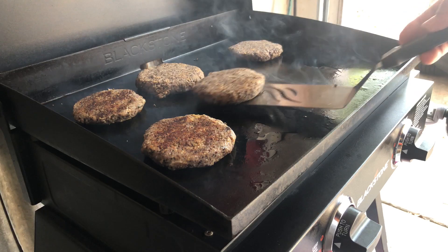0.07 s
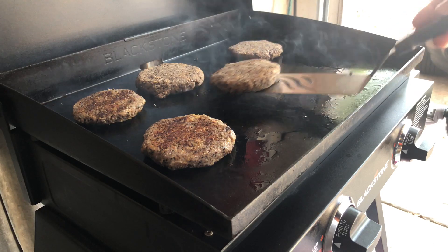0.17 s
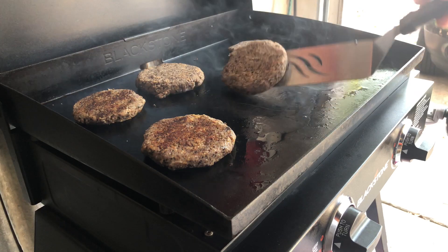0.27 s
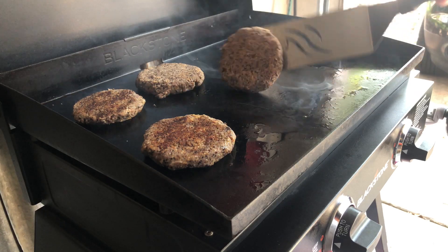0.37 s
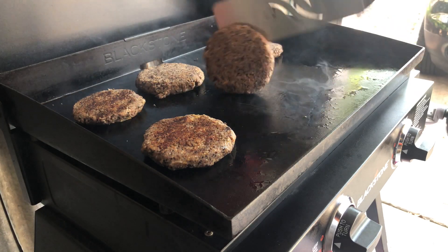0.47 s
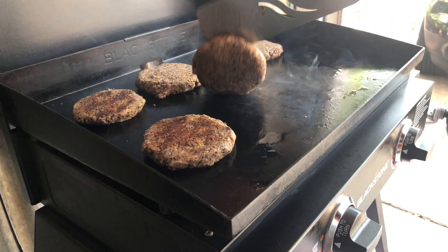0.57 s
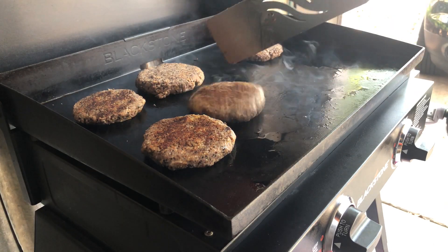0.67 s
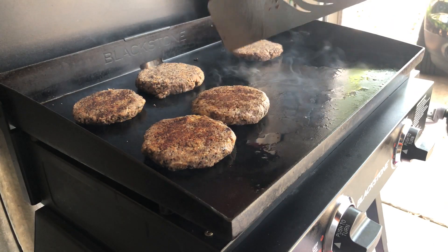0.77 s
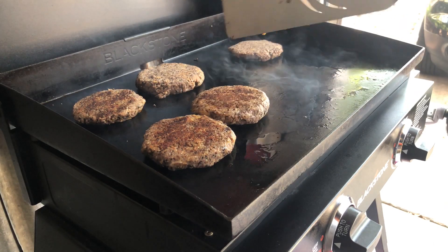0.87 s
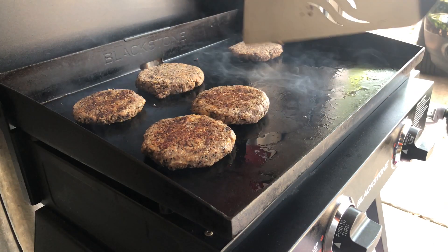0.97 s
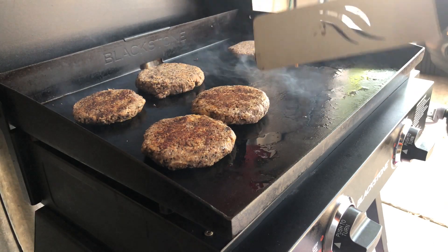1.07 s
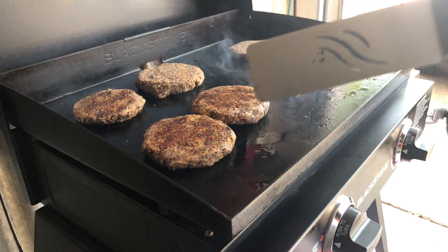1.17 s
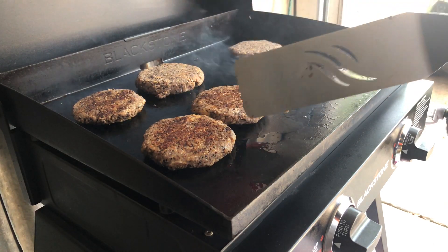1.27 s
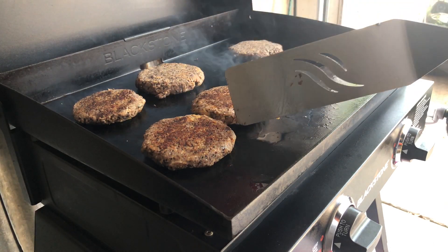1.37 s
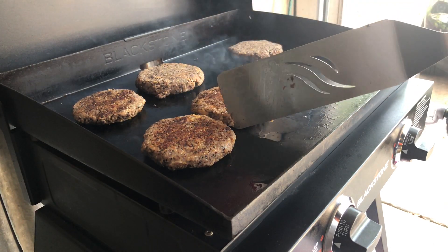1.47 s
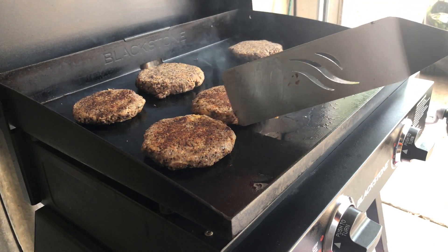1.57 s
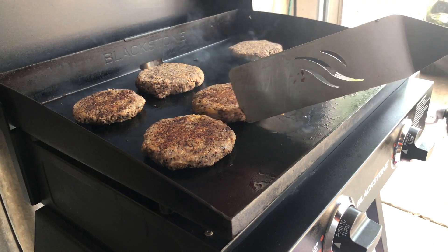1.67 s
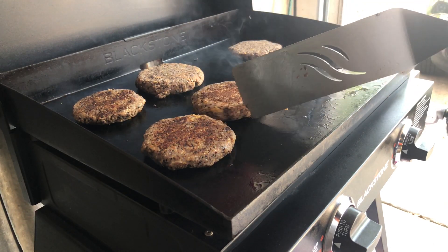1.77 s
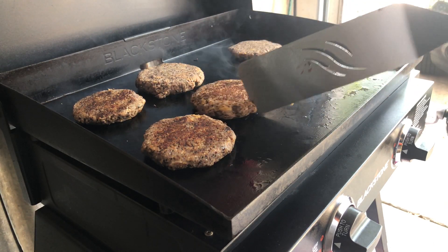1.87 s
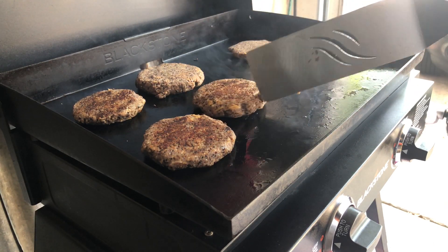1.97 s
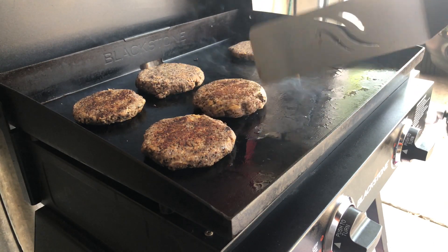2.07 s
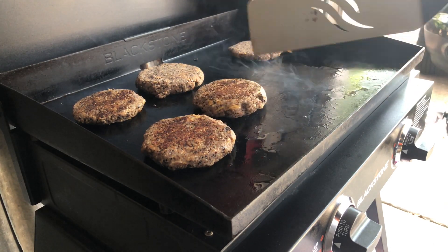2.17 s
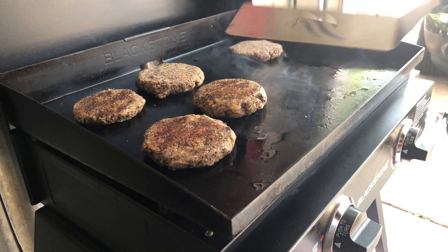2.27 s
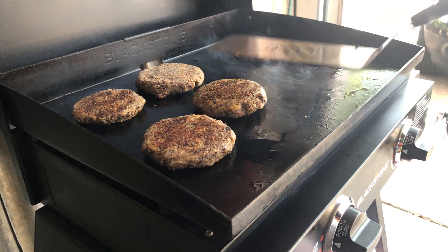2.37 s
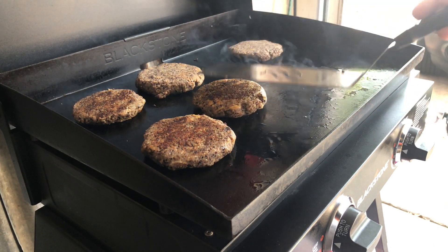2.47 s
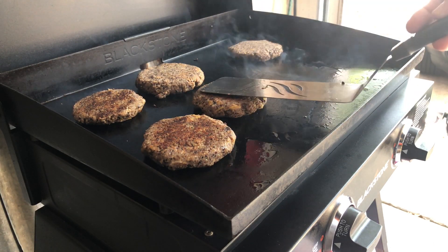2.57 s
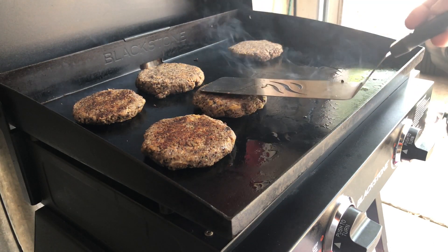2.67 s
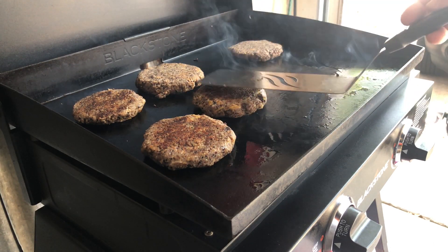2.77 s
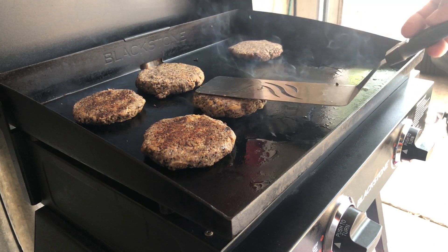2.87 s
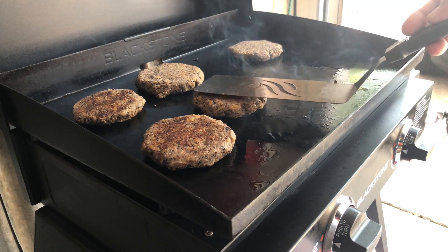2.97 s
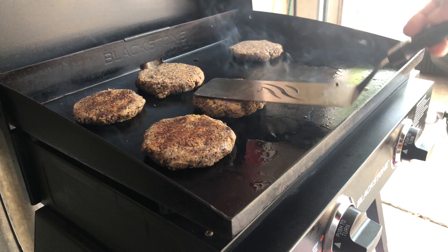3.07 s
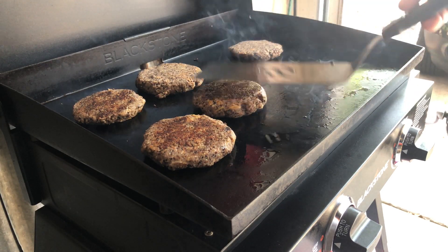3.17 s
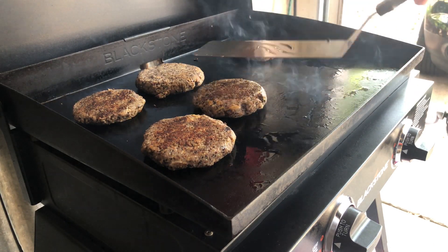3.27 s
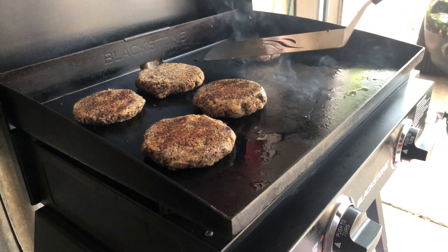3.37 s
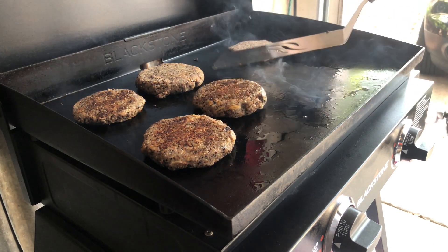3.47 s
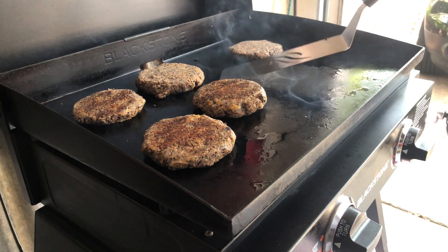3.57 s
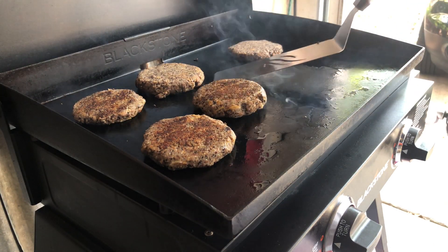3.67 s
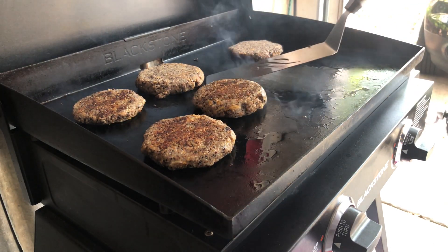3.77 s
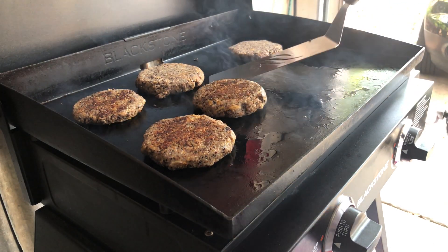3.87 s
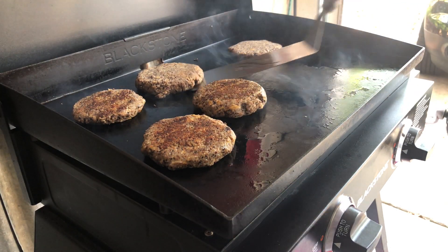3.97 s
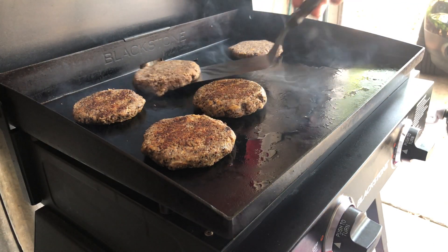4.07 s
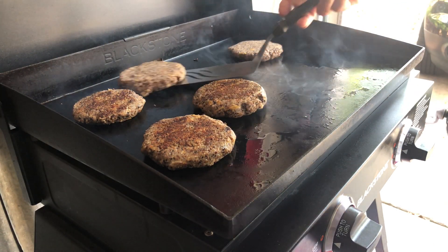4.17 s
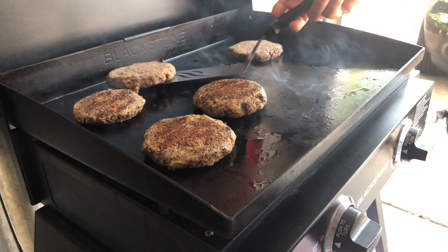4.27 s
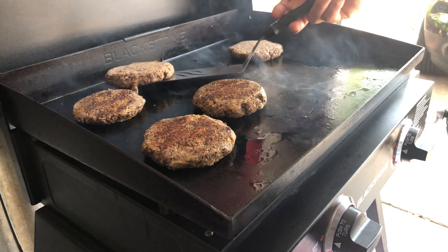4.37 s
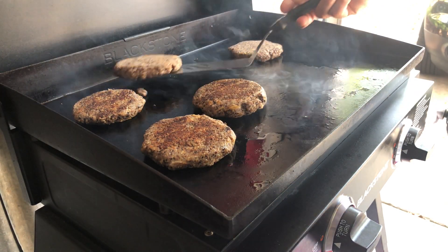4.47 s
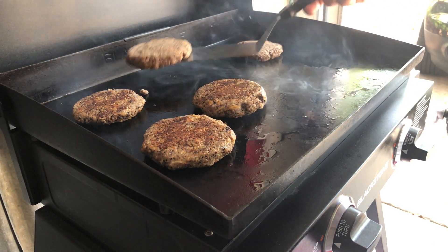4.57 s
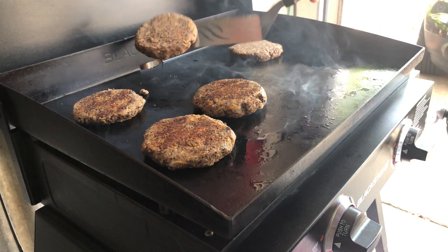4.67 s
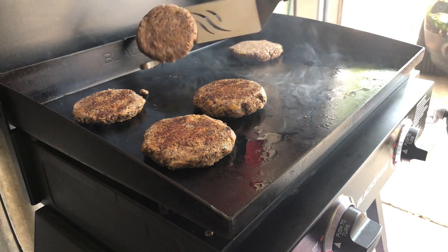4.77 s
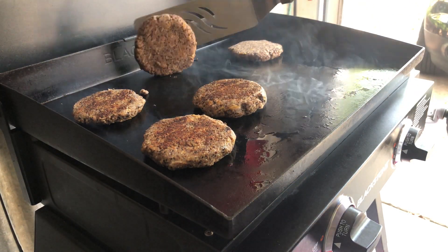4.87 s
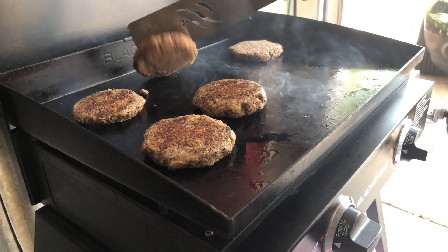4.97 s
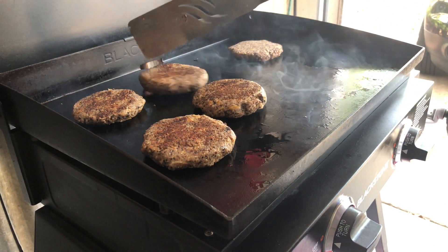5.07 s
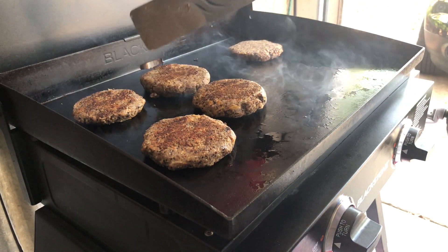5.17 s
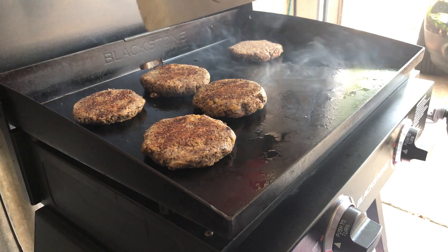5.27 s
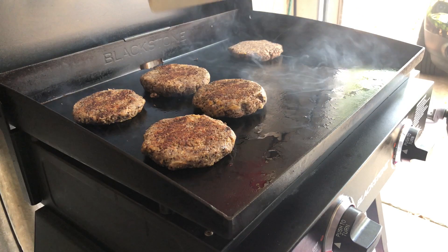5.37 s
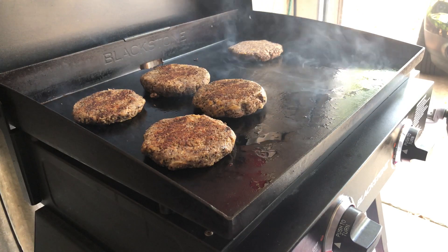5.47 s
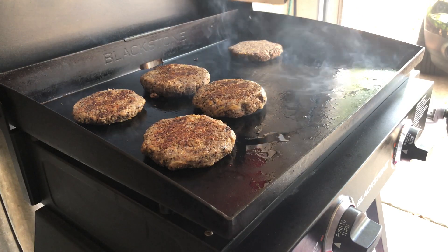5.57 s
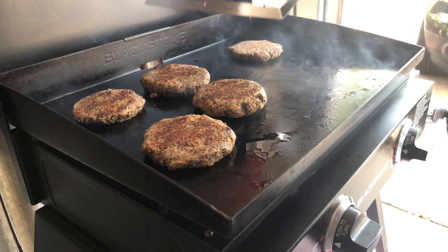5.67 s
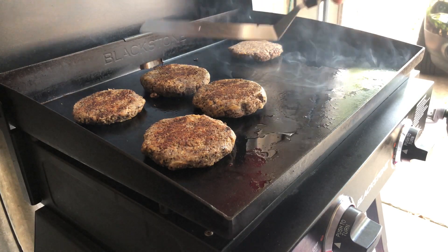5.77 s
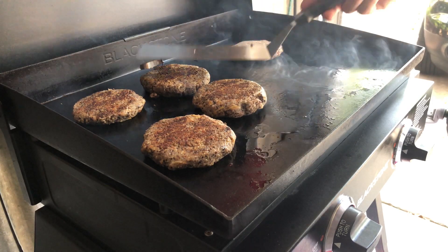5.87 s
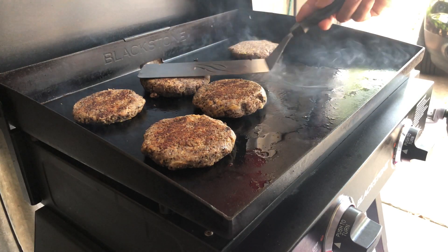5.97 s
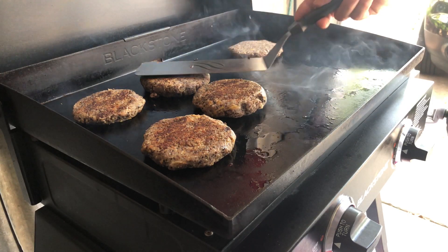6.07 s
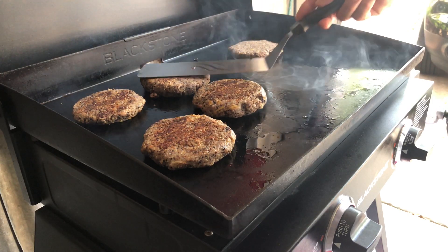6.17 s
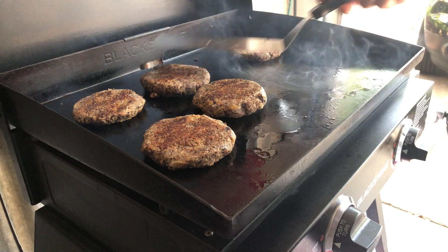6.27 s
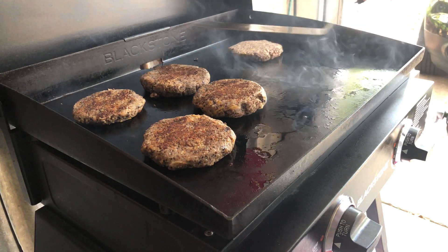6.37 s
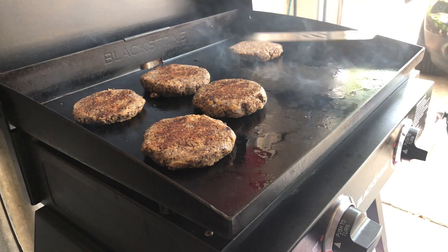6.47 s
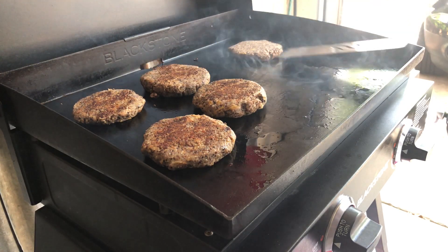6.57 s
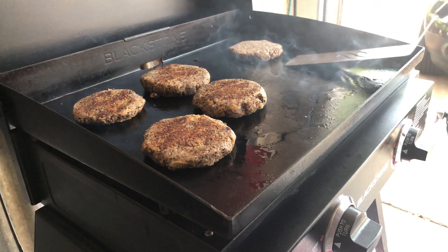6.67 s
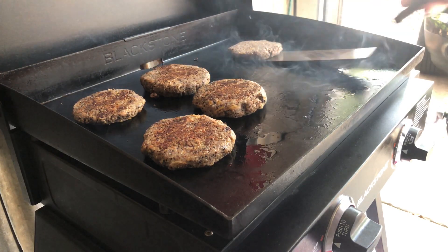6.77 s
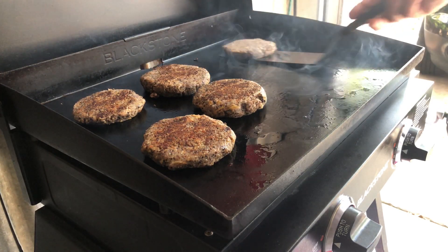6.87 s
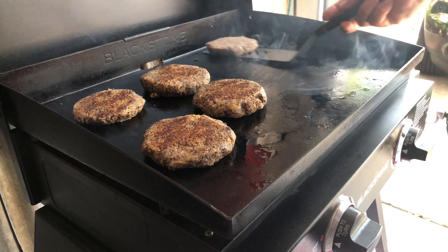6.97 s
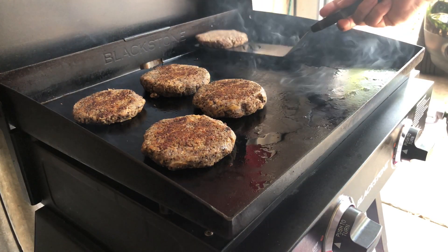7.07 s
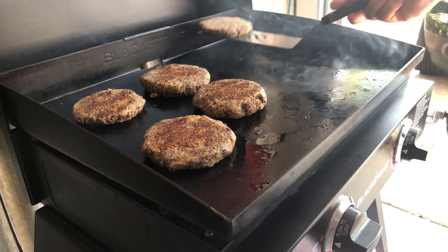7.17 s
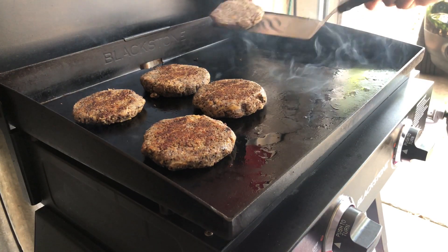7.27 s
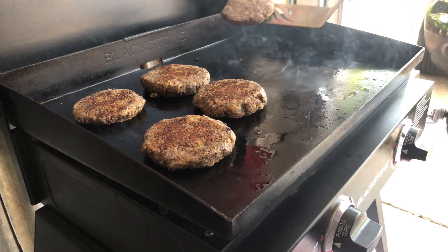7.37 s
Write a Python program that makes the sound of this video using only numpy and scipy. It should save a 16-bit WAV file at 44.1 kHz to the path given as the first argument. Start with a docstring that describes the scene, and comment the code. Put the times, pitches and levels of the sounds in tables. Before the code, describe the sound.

A bright, crackling sizzle of frying patties runs throughout, dotted with spits of fat. A thin steel spatula clicks and slides on the griddle around the middle and again near the end, ringing briefly. Between these come soft, wet slaps as meat is flipped and patted, and late on a few deep thumps from the cart. A weak breeze touches the microphone over a low hum and distant outdoor noise.

```python
"""At an outdoor food cart, patties sizzle on a steel griddle as bubbles of fat burst and spit.
A thin steel spatula rings as it taps and slides, and the meat lands and is patted with wet slaps.
The cart thumps when pushed, and moving air buffets the microphone.
Underneath it all, a mains hum lies below the distant outdoor noise."""
import sys
import numpy as np
from scipy import signal
from scipy.fft import rfft, irfft
from scipy.io import wavfile
from scipy.ndimage import uniform_filter1d

SR = 44100
rng = np.random.default_rng(int(sys.argv[2]) if len(sys.argv) > 2 else 0)


def waveform_to_disk(signal):
    """Save audio, clipped to [-1, 1], as 16-bit WAV at the path in sys.argv[1]."""
    frames = np.transpose(np.atleast_2d(signal))
    scaled = np.clip(frames, -1, 1) * 32767
    samples = np.round(scaled).astype(np.int16)
    wavfile.write(sys.argv[1], SR, samples)


N = 326781

# How loudly the fat fries: t/s, small bubble level/dB, large bubble level/dB
FRYING_LEVELS = [(0.0, -76, -59), (0.47, -59.5, -67), (1.11, -64, -61.5), (1.4, -61, -60),
                 (1.47, -55.5, -53.5), (1.56, -61, -55), (1.65, -52, -52.5), (1.94, -61.5, -56),
                 (2.0, -52.5, -57.5), (2.13, -64.5, -60), (2.29, -61.5, -61), (3.24, -57, -57.5),
                 (3.96, -58.5, -60), (4.22, -67, -59), (4.5, -60.5, -61.5), (5.1, -58.5, -57),
                 (5.43, -56.5, -58), (5.74, -60, -59.5), (6.19, -64, -56.5), (6.65, -60.5, -59),
                 (7.02, -63, -57.5), (7.41, -59, -55)]
# Tone of the small bubbles: f/Hz, relative level/dB
SMALL_BUBBLE_TONE = [(1470, -36), (2500, -27), (3770, -16), (5870, -8.5), (8330, -4), (12700, -10),
                     (16000, -21)]
# Tone of the large bubbles: f/Hz, relative level/dB
LARGE_BUBBLE_TONE = [(1200, -24.5), (2000, -12.5), (3500, -8), (5000, -4.5), (8000, -0.5), (14000, -12.5)]
# Drops of fat spitting: t/s, click level before the bass is cut/dB, f/Hz, relative steam level/dB
FAT_SPITS = [(0.191, -32, 5300, -9), (0.2547, -36.5, 7500, -9.5), (0.2918, -39, 8500, -9),
             (0.3642, -45, 8500, -14), (0.3866, -41, 8500, -14), (0.4394, -45, 9480, -16),
             (0.8412, -29, 8400, -15), (1.2256, -34.5, 7600, -6.5), (1.2922, -31.5, 7600, -19),
             (1.365, -36, 7460, -10), (1.4371, -37, 8990, -16), (1.5209, -33, 7670, -23),
             (2.184, -32.5, 8300, -11), (2.251, -39, 3980, -16), (3.0805, -50, 8600, -18),
             (3.402, -35, 7040, -20), (3.459, -35, 7750, -14), (3.8255, -33, 8420, -10),
             (3.8456, -34, 6700, -11), (4.5392, -37, 8500, -16), (4.589, -35.5, 6800, -1),
             (4.7432, -35, 7710, -18), (4.815, -48, 8300, -16), (4.8868, -36, 7080, -16),
             (4.9332, -27, 10800, -16), (5.0886, -38, 7480, -12), (5.1406, -36, 7700, -18),
             (5.195, -35, 9500, -16), (5.265, -32, 6670, -14), (5.4644, -40, 7700, -13),
             (5.897, -27, 6940, -13), (5.478, -32, 9000, -14), (5.9374, -35, 7300, -10),
             (6.2176, -36, 9860, -20), (6.9848, -24.5, 7900, -16), (7.028, -33, 8000, -20),
             (7.153, -35, 8700, -23), (7.3366, -33.5, 8370, -14)]
# The blade slides on the plate. A fade is the time taken to drop by 60 dB.
# t/s, rise/s, hold/s, fade/s, push level/dB, brightness/(dB per octave),
# pitch factor, damping factor, boosted f/Hz, boost/dB
SPATULA_STROKES = [(2.258, 0.011, 0.016, 0.76, -69, -12, 1.07, 2.6, 2200, 10),
                   (2.492, 0.012, .01, 0.44, -62, -10.5, 0.95, 6.6, 1990, -1),
                   (3.631, 0.0067, 0.0081, 0.27, -41, -3, 0.99, 0.67, 2200, 1),
                   (3.716, 0.023, 0.071, 0.24, -65, 1, 1.01, 1.5, 664, 31),
                   (3.956, 0.059, 0.083, 0.47, -46.5, -1, 1.005, 1.06, 1220, 8.5),
                   (6.684, 0.0048, 0.0067, 0.27, -44.5, -6.5, 1.03, 1.8, 1680, 5),
                   (6.725, 0.12, 0.025, 0.47, -44, -1, 1.001, 1.17, 1000, 10)]
# The blade's edge hits the plate:
# t/s, level/dB, brightness/(dB per octave), pitch factor, damping factor, boosted f/Hz, boost/dB
SPATULA_TAPS = [(3.634, -27.5, -1, 1, 0.73, 2180, -9), (6.691, -30.5, -2, 0.87, 2.2, 1860, 18)]
# The notes the steel blade rings at: f/Hz, relative level/dB, change with a patty on top/dB
BLADE_NOTES = [(416, -13.5, -7), (517, -18, 5.5), (693, -7, -10), (807.3, -15.5, 14), (896, -7.5, -9),
               (1084, -10, -1), (1173, -7, 2.5), (1557, -10, 7), (1644, -3.5, -8), (1827, -9, 1.5),
               (2020, -5.5, 6), (2072, 2, -5), (2145, -4, 5), (2262, -3, 6), (2490, -14, 14),
               (2930, -10.5, 10.5), (3490, -6.5, 3), (3920, -5.5, 3.5), (4365, -2.5, 5.5), (5040, -6, -13),
               (5690, 6.5, -5), (6150, 7, -1), (6650, 7, 0.5), (7200, 7, -2), (7570, -3, 6),
               (7980, 5.5, 2.5), (9020, -0.5, 8), (8800, -9, -8), (9300, 2, -1)]
LESSER_NOTES_HZ = 2600 + 7400 * rng.random(size=44)
# Meat lands or is patted:
# t/s, level/dB, f/Hz, width as share of f, fade/s, relative splash level/dB, relative plate level/dB
MEAT_SLAPS = [(.735, -46, 790, 1.35, 0.27, 1, -22), (.754, -52, 626, 0.55, 0.41, 4, -17),
              (.971, -55, 507, 1.2, 0.29, -11, -33), (2.304, -49.5, 477, 0.84, 0.061, -22, -27),
              (2.914, -51.5, 780, 0.51, 0.12, 10.5, -20), (3.094, -56.5, 860, 0.84, 0.094, 3, -14),
              (5.098, -49.5, 1010, 0.4, 0.16, -16, -5.5), (5.999, -49, 890, 0.33, 0.077, 14, -11),
              (6.16, -51, 880, 0.37, 0.053, -29, -8.5)]
# Notes of the soft clink as a patty is lifted: f/Hz, width/Hz, relative level/dB
CLINK_NOTES = [(955, 91, -3), (1080, 29, -1.5), (1550, 73, 0.5), (2080, 27, -4.5), (3200, 80, -10),
               (3670, 65, -7)]
# The cart rocks on its frame: t/s, level/dB, fade/s
CART_THUMPS = [(6.047, -23.5, 0.33), (6.151, -30, 0.31), (6.648, -25, 0.67), (7.27, -36.5, 0.45)]
# Sudden steps in air pressure at the microphone: t/s, level/dB, rise/s
PRESSURE_JOLTS = [(.447, -39.5, 0.0023), (0.615, -36.5, 0.00034)]
# Puffs of air on the microphone: middle t/s, level/dB, swing f/Hz
AIR_PUFFS = [(0.067, -34, 3.04), (0.4, -39, 15), (1.231, -30.5, 10.3), (1.448, -33.5, 11.5),
             (1.85, -39, 14.4), (2.512, -37, 13.7), (4.171, -34, 19), (4.268, -35.5, 16),
             (4.857, -36.5, 15.7), (5.121, -32.5, 6.8), (5.508, -37.5, 6), (6.07, -36.5, 18),
             (6.661, -39, 11)]
# Tones of the mains hum: f/Hz, wavering rate/Hz, level/dB
HUM_TONES = [(61.2, 1.666, -59.5), (120.2, 1.95, -67.5)]
# Tone of the distant outdoors: f/Hz, relative level/dB
OUTDOOR_TONE = [(15, -34), (25, 1), (65, -11.5), (82, -13), (124, -15.5), (146, -23.5), (366, -32.5),
                (604, -35.5), (3000, -41.5), (3900, -57), (6600, -120)]

FRAME_HZ = 42.27  # the cart frame's own pitch
PLATE_HZ, PLATE_WIDTH_HZ = 493, 6.5  # the griddle plate's ring
UNDER_PATTY_S = 0.097  # how far into a stroke the blade gets under the patty
STEEL_LOSS = .009  # a note's width as a share of its pitch; wider notes die sooner


def sizzle():
    """Small bubbles give a high fizz, large ones a lower crackle; the boil surges unevenly."""
    fizz_db, crackle_db = curves(FRYING_LEVELS)
    surge_db = .7 * wander(10) + .45 * wander(40)
    small = bubbles(per_second=4000, spread_db=4, tail_s=.008, tail_db=-17)
    large = bubbles(per_second=900, spread_db=.78, tail_s=.038, tail_db=-12)
    fizz = set_level(shape_tone(small, SMALL_BUBBLE_TONE), 0) * gain(fizz_db + surge_db)
    crackle = set_level(shape_tone(large, LARGE_BUBBLE_TONE), 0)
    return fizz + crackle * gain(crackle_db + 1.18 * surge_db + 1.5 * wander(23))


def spits():
    """Drops of fat explode with a click, a bright crack and steam; lesser ones crackle at random."""
    strays = bubbles(per_second=30, spread_db=3, tail_s=.012, tail_db=-20)
    out = set_level(resonate(strays, 7300, 8000), -72.5)
    for start, db, hz, steam_db in FAT_SPITS:
        click = burst(hz, fade_s=.0025, width_share=.8, tail_db=-28)
        crack = burst(12400, fade_s=.004, width_share=.56, tail_db=-33)
        steam = burst(hz, fade_s=.059, width_share=.24, tail_db=6)
        add(out, start, gain(db) * click)
        add(out, start, gain(db - 22) * crack)
        add(out, start, gain(db + steam_db) * steam)
    return keep_band(out, 3, 3600, "high")  # tiny drops have no bass


def spatula():
    """Greasy rubbing swells, holds and eases along each stroke; taps knock the blade sharply."""
    grit = bubbles(per_second=9000, spread_db=2.2, tail_s=.004, tail_db=-4)
    grit = set_level(grit, 0) * gain(1.2 * wander(60))
    out = np.zeros(N)
    for start, rise, hold, fade_s, db, brightness, *contact in SPATULA_STROKES:
        first = int(start * SR)
        t = np.arange(min(int((rise + hold + fade_s + .3) * SR), N - first)) / SR
        swell_db = np.minimum(-21.5 * (1 - t / rise), 0)
        ease_db = np.minimum(-60 * (t - rise - hold) / fade_s, 0)
        force = grit[first:first + len(t)] * gain(db + swell_db + ease_db)
        brightness = np.clip(brightness + .13 * ease_db, -9, 9)  # a lighter press sounds duller
        add(out, start, blade(force, brightness, *contact, rasp_db=-13))
    for start, db, brightness, *contact in SPATULA_TAPS:
        knock = np.r_[fading_noise(.008), np.zeros(SR // 3)]
        ring = blade(knock, brightness, *contact, rasp_db=-30)
        add(out, start, set_peak(ring, db))
    return keep_band(out, 2, 11000, "low")  # grease dulls the very top


def blade(force, brightness, pitch, damping, boost_hz, boost_db, rasp_db):
    """The steel rings at its own notes, each pushed unevenly; a raw rasp fills the gaps."""
    t = np.arange(len(force)) / SR
    loaded = np.clip((t - UNDER_PATTY_S) / .03 + .5, 0, 1)
    patch_times = np.arange(0, t[-1] + .05, .02)
    ring = 0
    for hz, db, load_db in BLADE_NOTES + [(hz, -9, 0) for hz in LESSER_NOTES_HZ]:
        near_boost = np.exp(-(np.log2(hz / boost_hz) / .25) ** 2)  # reaches about a quarter octave
        tone_db = brightness * np.log2(hz / 2000) + boost_db * near_boost
        uneven_db = 2.5 * np.interp(t, patch_times, rng.standard_normal(len(patch_times)))
        push = force * gain(tone_db + load_db * loaded + uneven_db)
        ring += gain(db - 18.5) * resonate(push, pitch * hz, damping * STEEL_LOSS * hz)
    low_rasp = resonate(force, boost_hz, 1.8 * boost_hz)
    high_rasp = resonate(force * gain(4 + 2.3 * brightness), 4400, 4200)
    return ring + gain(rasp_db) * (low_rasp + high_rasp)


def slaps():
    """Meat hits with a dull knock, a thud from its weight, a splash of fat and a faint plate ring."""
    out = np.zeros(N)
    for start, db, hz, width, fade_s, splash_db, plate_db in MEAT_SLAPS:
        hit = np.r_[burst(hz, min(fade_s, .24), width, tail_db=-9), np.zeros(SR // 3)]
        knock = set_peak(resonate(hit, hz, 2.2 * width * hz), db)  # soft meat has no treble
        thud = burst(261, min(fade_s, .24), width_share=.38, tail_db=5)
        splash = burst(7000, min(.7 * fade_s, .24), width_share=.88, tail_db=6)
        add(out, start, knock + gain(plate_db) * resonate(knock, PLATE_HZ, PLATE_WIDTH_HZ))
        add(out, start, gain(db - 4) * thud)
        add(out, start, gain(db + splash_db) * splash)
    return out


def clink():
    """A light touch makes the metal ring briefly as a patty is lifted."""
    length = SR // 45
    touch = np.hanning(SR // 30)[-length:] * rng.standard_normal(length)
    touch = np.r_[touch, np.zeros(SR // 5)]
    ring = sum(gain(db) * resonate(touch, hz, width_hz) for hz, width_hz, db in CLINK_NOTES)
    out = np.zeros(N)
    add(out, start=.314, piece=set_peak(ring, db=-44))
    return out


def cart():
    """The frame swings up quickly and rings out; each jolt drops the pressure, which leaks back."""
    out = np.zeros(N)
    for start, db, fade_s in CART_THUMPS:
        decay = fade(fade_s)
        t = np.arange(len(decay)) / SR
        swing_up = np.minimum(t / .019, 1)
        add(out, start, gain(db) * swing_up * decay * np.sin(2 * np.pi * FRAME_HZ * t))
    for start, db, rise in PRESSURE_JOLTS:
        rise_samples = max(int(rise * SR), 1)
        step = np.r_[np.zeros(rise_samples), fade(.16)]
        add(out, start, -gain(db) * uniform_filter1d(step, rise_samples))
    return out


def air():
    """A weak, low breeze blows; each puff swings the pressure once and rustles at the microphone."""
    noise = rng.standard_normal((2, N))
    out = set_level(keep_band(noise[0], 3, [4, 22], "band"), -51)
    rustle = set_level(resonate(resonate(noise[1], 69, 77), 81, 130), 0)
    t = np.arange(N) / SR
    for middle, db, hz in AIR_PUFFS:
        cycles = hz * (t - middle)
        out += gain(db) * np.exp(-3 * cycles ** 2) * np.sin(2 * np.pi * cycles)
        out += gain(db - 33) * np.exp(-.6 * cycles ** 2) * rustle
    return out


def background():
    """The mains hum wavers, the cart's frame trembles and outdoor noise comes from far away."""
    noise = rng.standard_normal((2, N))
    t = np.arange(N) / SR
    hum = np.zeros(N)
    for hz, waver_hz, db in HUM_TONES:
        strength = np.sqrt(2) * gain(db + .45 * wander(waver_hz))
        hum += strength * np.sin(2 * np.pi * hz * t + .5 * wander(waver_hz))
    frame = set_level(resonate(noise[0], FRAME_HZ, width_hz=7.9), -63)
    outdoors = set_level(shape_tone(noise[1], OUTDOOR_TONE), -55) * gain(.9 * wander(4))
    return hum + frame + outdoors


def bubbles(per_second, spread_db, tail_s, tail_db):
    """Pops at random moments, most tiny and a few large, each with a short hissing tail."""
    when, how_big, which_way = rng.random((N, 3)).T
    size_db = np.minimum(-spread_db * np.log(how_big + 1e-9), 5 * spread_db)
    pops = gain(size_db) * (when < per_second / SR)
    tail_power = np.abs(signal.fftconvolve(pops ** 2, fade(tail_s) ** 2)[:N])
    hiss = np.sqrt(tail_power) * rng.standard_normal(N)
    return pops * np.sign(which_way - .5) + gain(tail_db) * hiss


def burst(hz, fade_s, width_share, tail_db):
    """A click and its noisy tail, loosely tuned to one pitch, with a peak of 1."""
    push = gain(tail_db) * fading_noise(fade_s)
    push[0] += 1
    return set_peak(resonate(push, hz, width_share * hz), 0)


def resonate(x, hz, width_hz):
    """Make a sound ring at one pitch; a smaller width rings for longer."""
    r = np.exp(-np.pi * max(width_hz, .1) / SR)
    feedback = [1, -2 * r * np.cos(2 * np.pi * hz / SR), r * r]
    return np.sqrt(1 - r * r) * signal.lfilter([1, 0, -r], feedback, x)


def shape_tone(x, points):
    """Turn the lows and highs up or down to follow a table of f/Hz, level/dB."""
    hz, db = np.transpose(points)
    size = 1 << 14
    log_hz = np.log(np.fft.rfftfreq(size, 1 / SR) + 1)
    log_gain = np.log(gain(np.interp(log_hz, np.log(hz), db)))
    folded = irfft(log_gain)  # fold in time, so that nothing rings before its cause
    folded[1:size // 2] *= 2
    folded[size // 2 + 1:] = 0
    return signal.fftconvolve(x, irfft(np.exp(rfft(folded))))[:N]


def keep_band(x, steepness, hz, kind):
    """Keep the lows, the highs or a band between two pitches."""
    return signal.sosfilt(signal.butter(steepness, hz, kind, fs=SR, output="sos"), x)


def fade(seconds):
    """A curve that drops by 60 dB in the given time."""
    length = max(seconds, .002) * SR
    return np.exp(-np.log(1000) * np.arange(int(length)) / length)


def fading_noise(seconds):
    """A hiss that dies away."""
    decay = fade(seconds)
    return decay * rng.standard_normal(len(decay))


def wander(per_second):
    """A smooth random drift, roughly between -1 and 1."""
    hold = int(SR / per_second)
    steps = np.repeat(rng.standard_normal(N // hold + 1), hold)
    return 1.31 * uniform_filter1d(uniform_filter1d(steps, hold), hold)[:N]


def curves(table):
    """Join a table's timed rows with straight lines."""
    times, *columns = np.transpose(table)
    return [np.interp(np.arange(N) / SR, times, column) for column in columns]


def gain(db):
    """Turn decibels into a multiplier."""
    return 10 ** (np.asarray(db) / 20)


def set_level(x, db):
    """Scale a sound to an average (rms) level."""
    return x * gain(db) / np.sqrt(np.mean(x ** 2))


def set_peak(x, db):
    """Scale a sound to a peak level."""
    return x * gain(db) / np.abs(x).max()


def add(out, start, piece):
    """Mix a piece in at a time in seconds."""
    first = int(start * SR)
    out[first:first + len(piece)] += piece[:N - first]


def scene():
    """Everything reaches one microphone."""
    return (sizzle() + spits() + spatula() + slaps() + clink() + cart() + air() + background())[None]


def record(dry):
    """Cut away the very highest treble."""
    top_hz = 15870
    return signal.sosfilt(signal.ellip(10, .2, 60, top_hz, fs=SR, output="sos"), dry)


dry = scene()
out = record(dry)
waveform_to_disk(out)
```